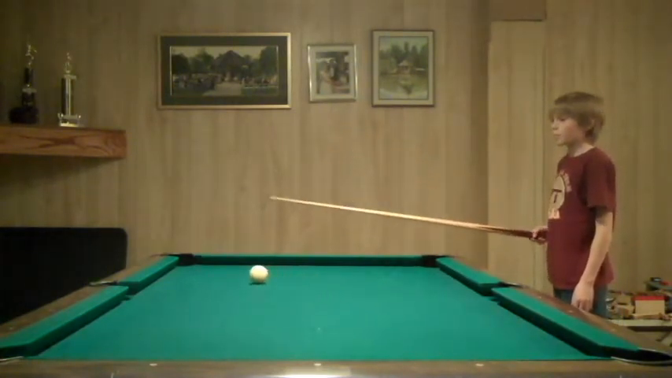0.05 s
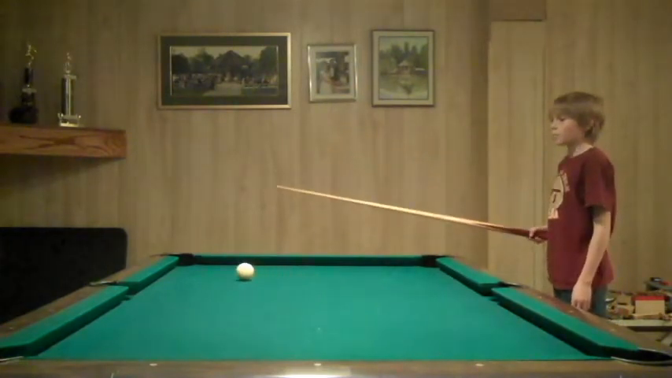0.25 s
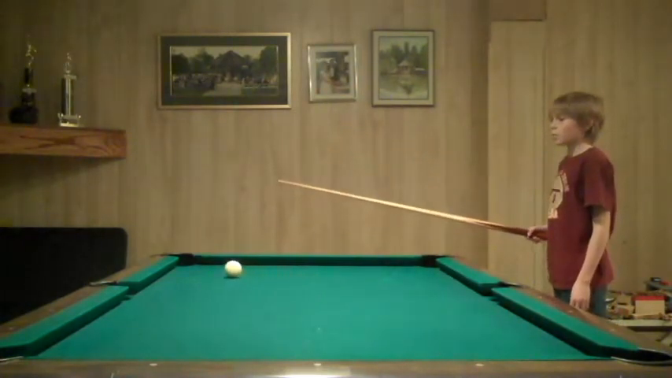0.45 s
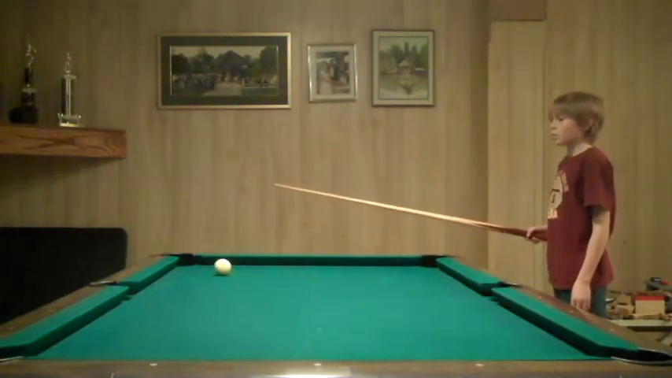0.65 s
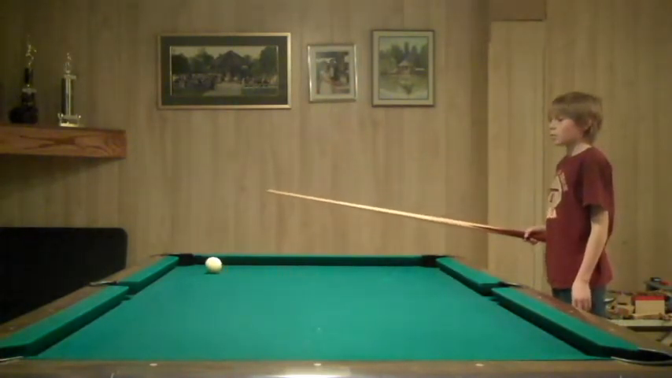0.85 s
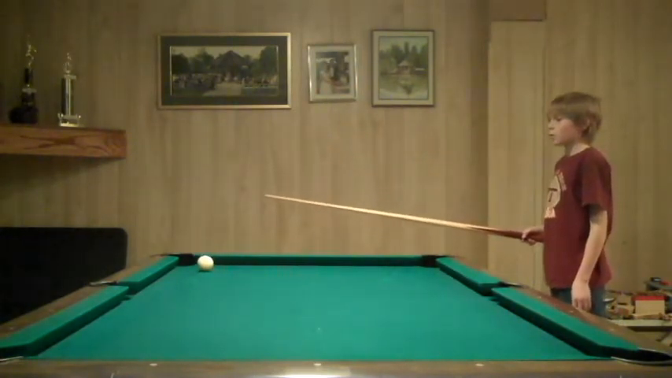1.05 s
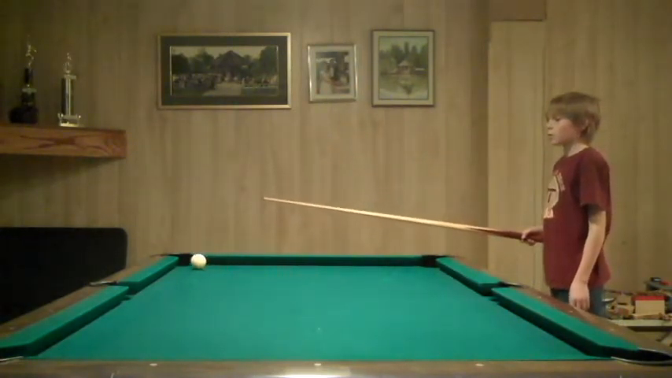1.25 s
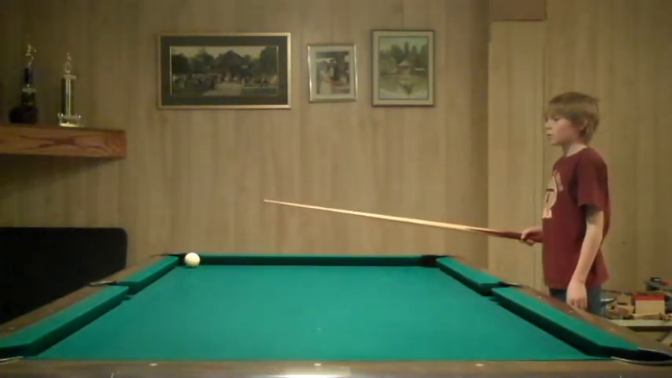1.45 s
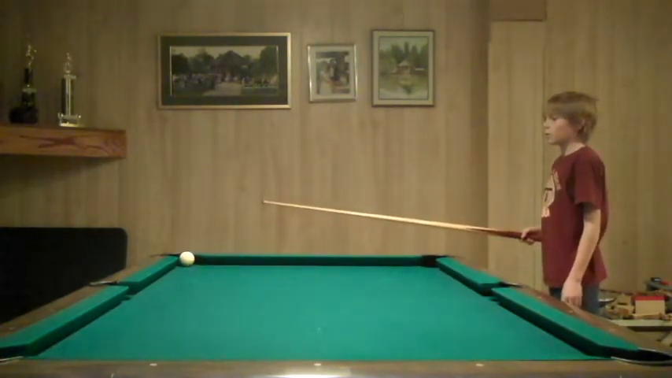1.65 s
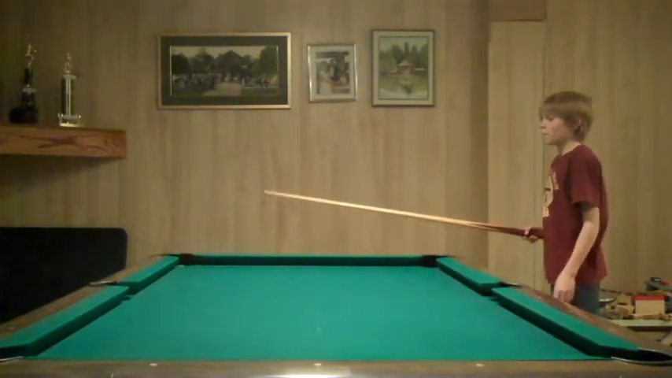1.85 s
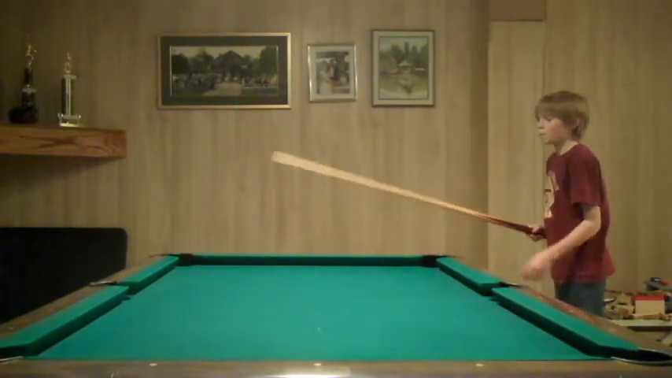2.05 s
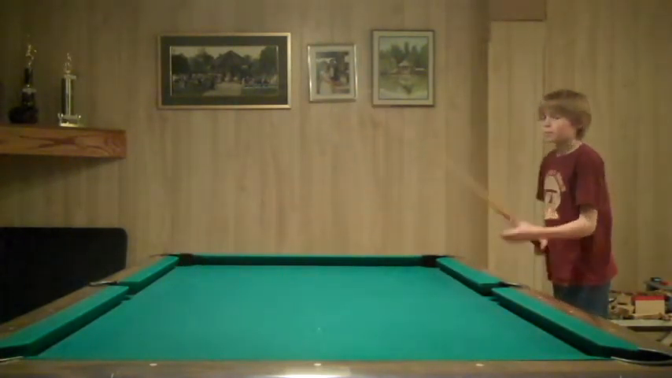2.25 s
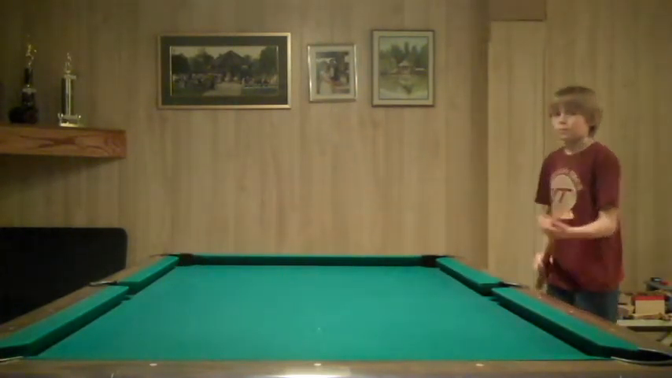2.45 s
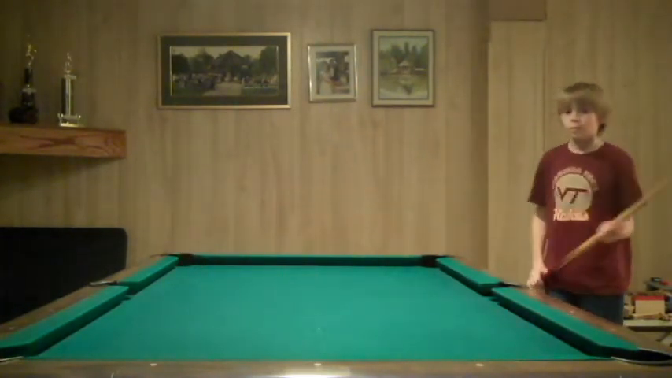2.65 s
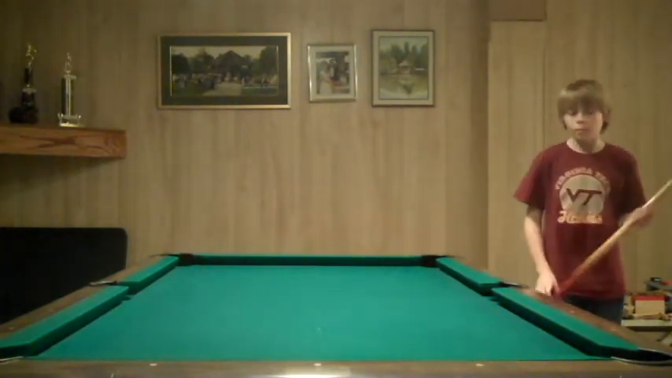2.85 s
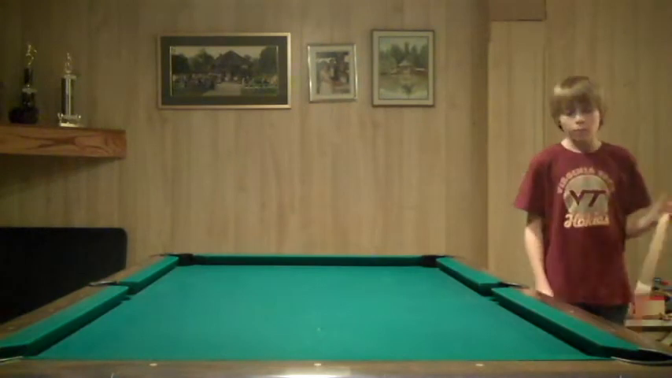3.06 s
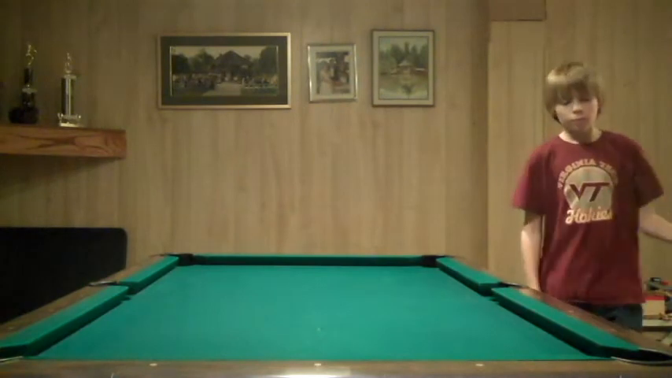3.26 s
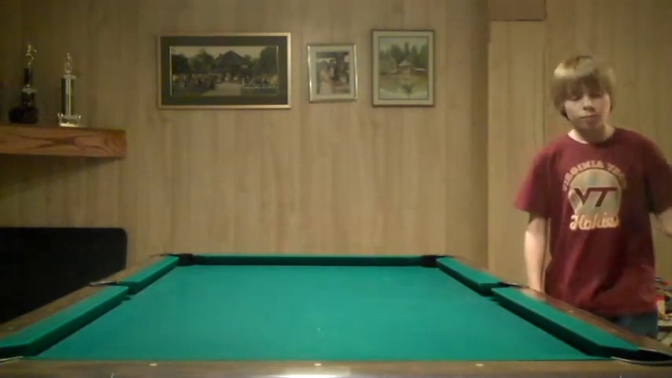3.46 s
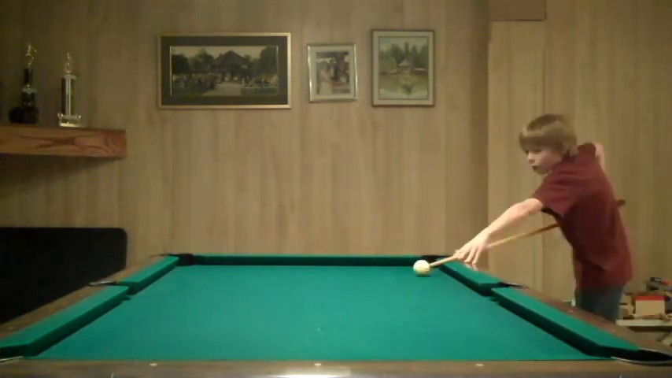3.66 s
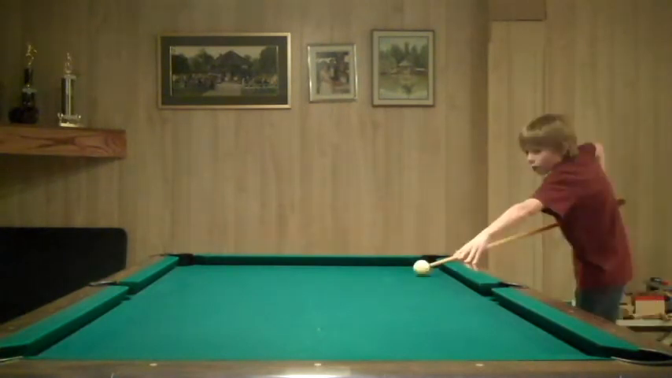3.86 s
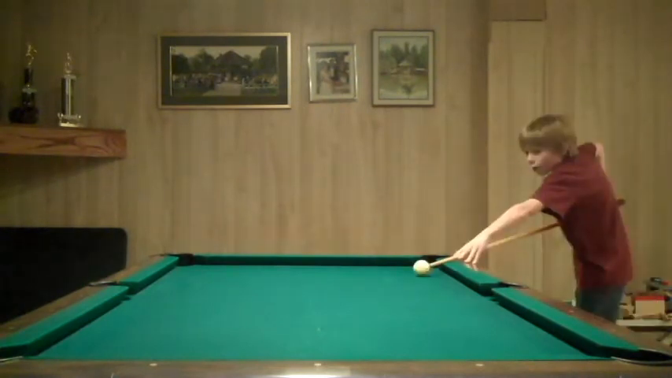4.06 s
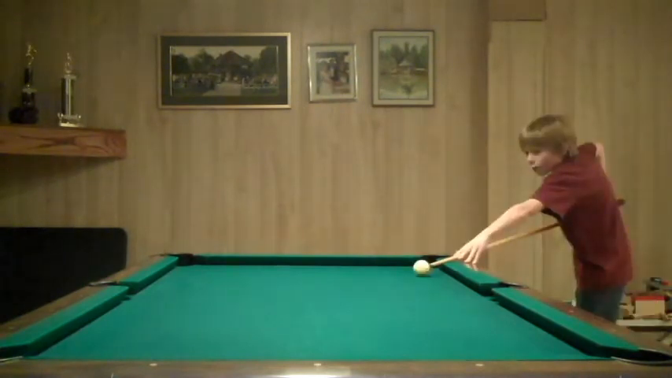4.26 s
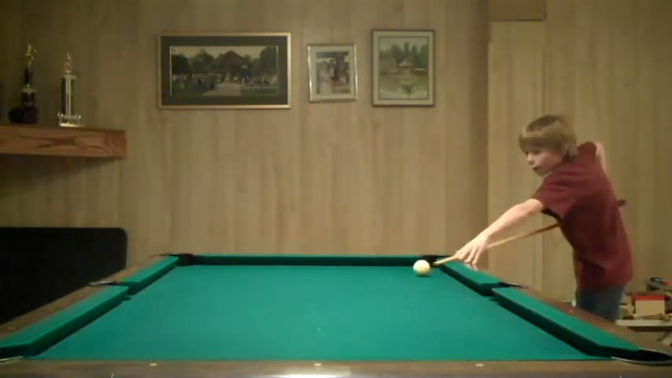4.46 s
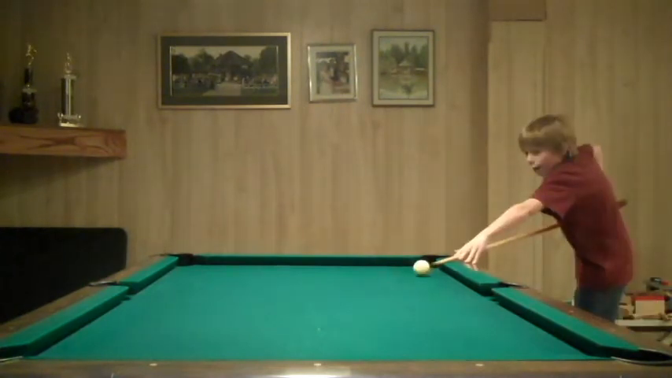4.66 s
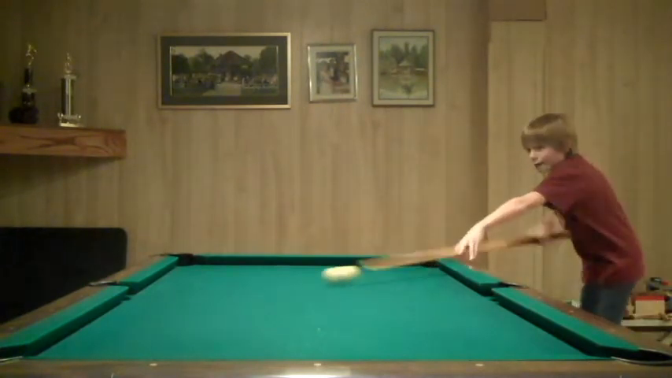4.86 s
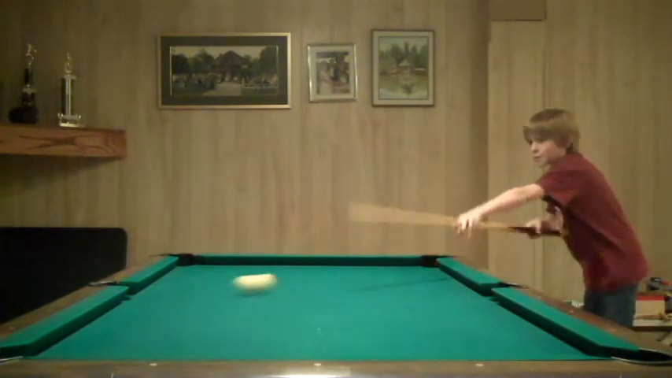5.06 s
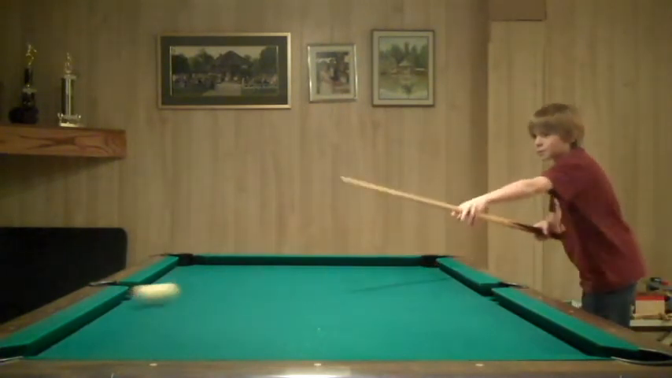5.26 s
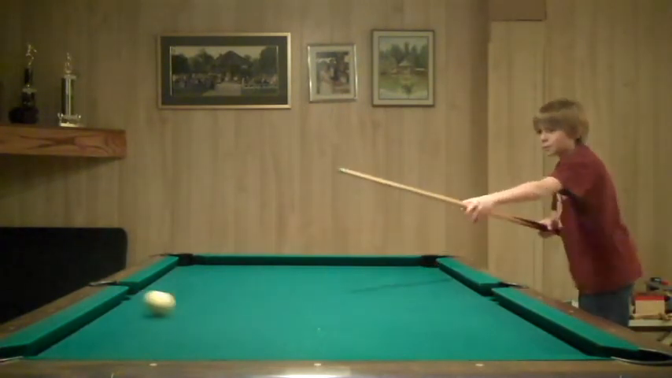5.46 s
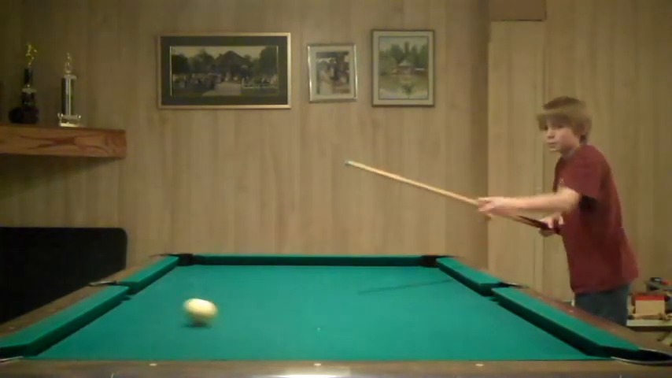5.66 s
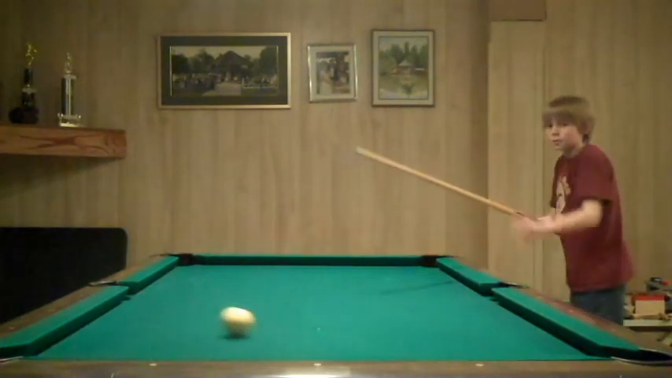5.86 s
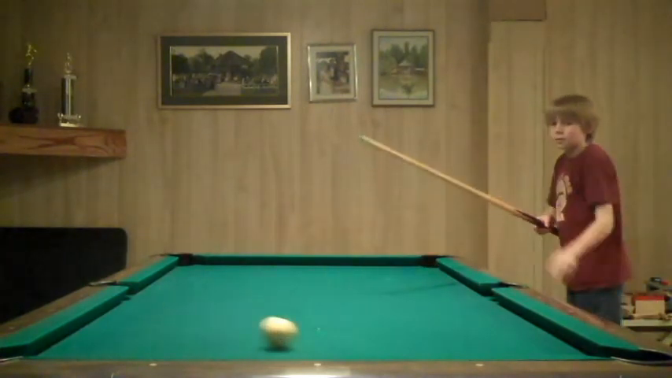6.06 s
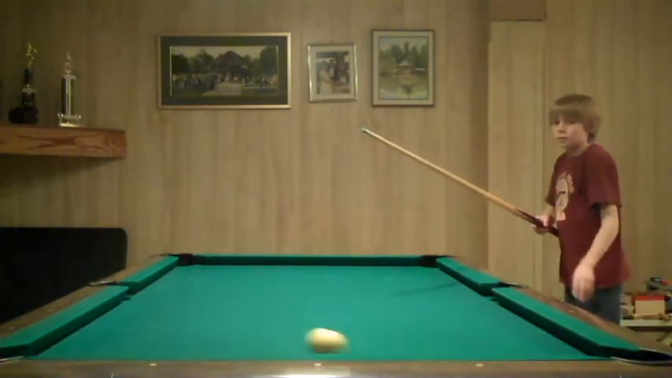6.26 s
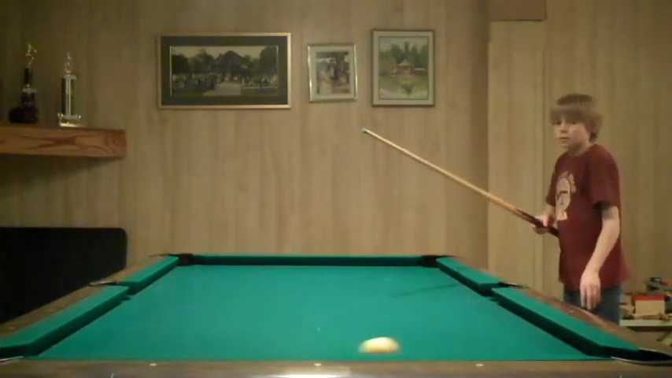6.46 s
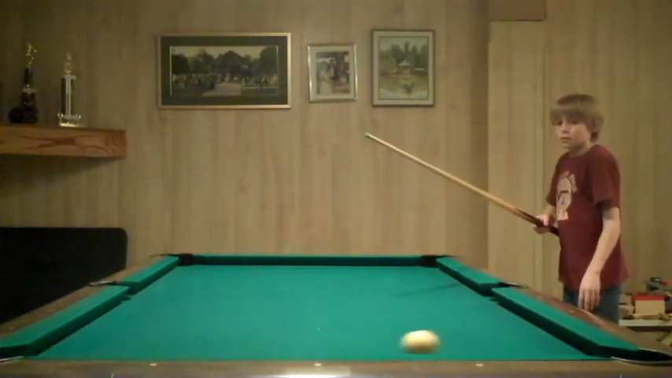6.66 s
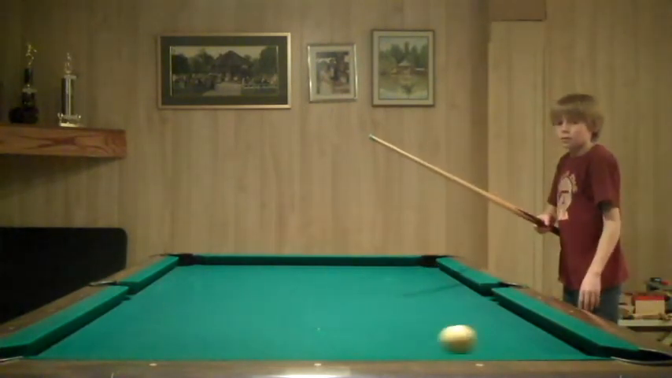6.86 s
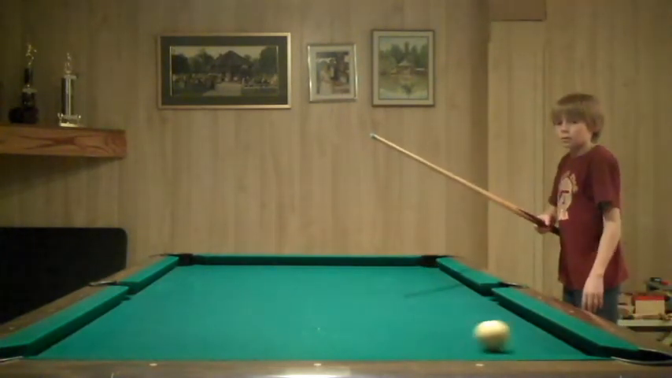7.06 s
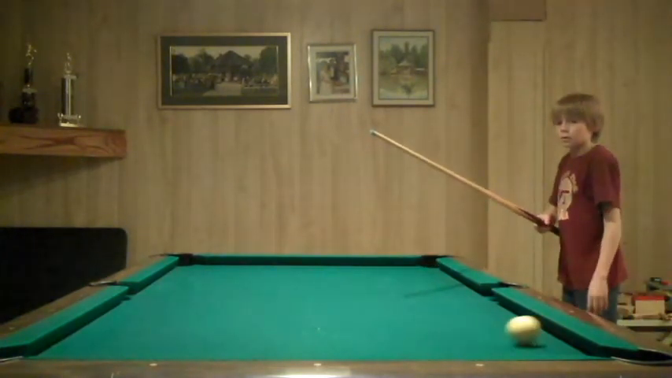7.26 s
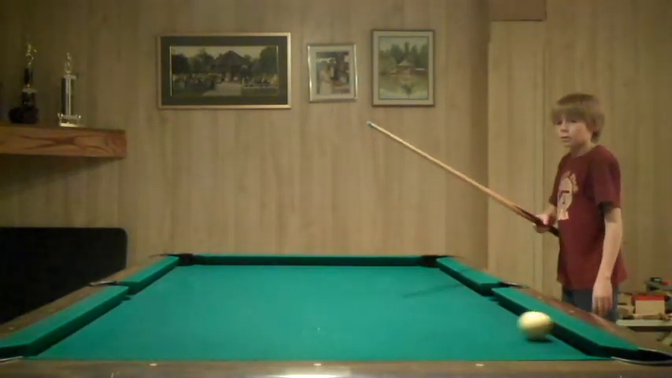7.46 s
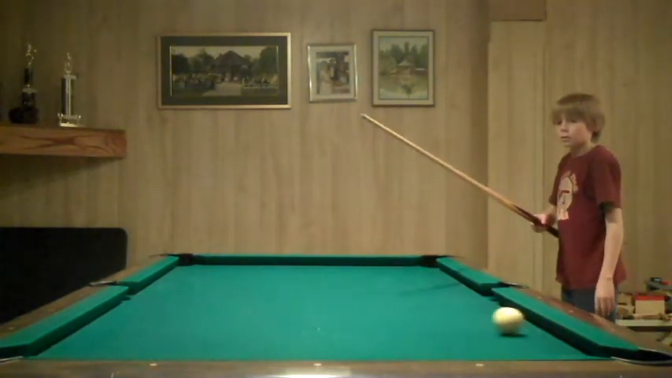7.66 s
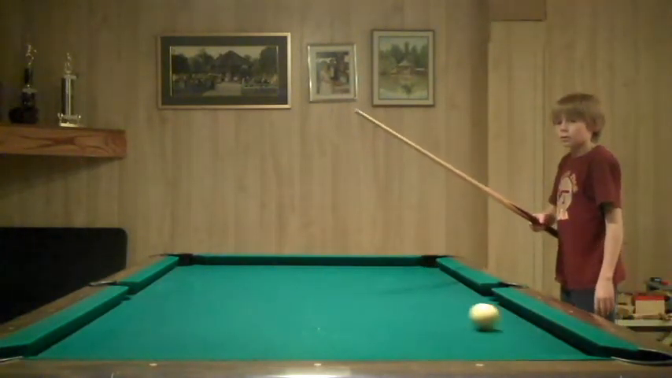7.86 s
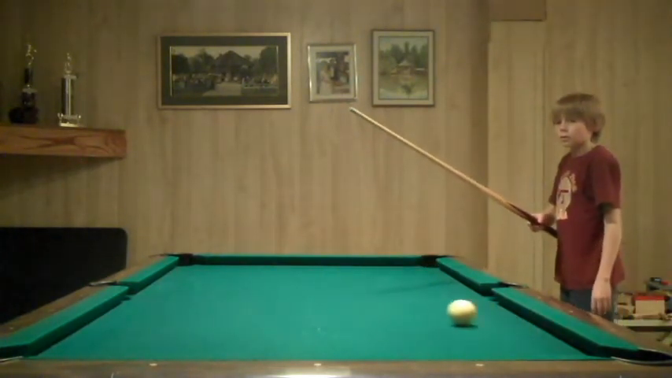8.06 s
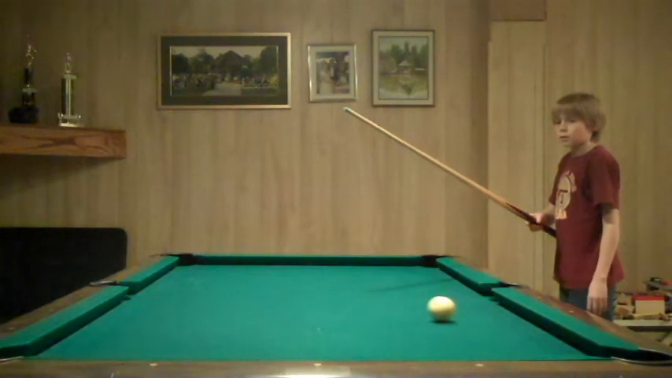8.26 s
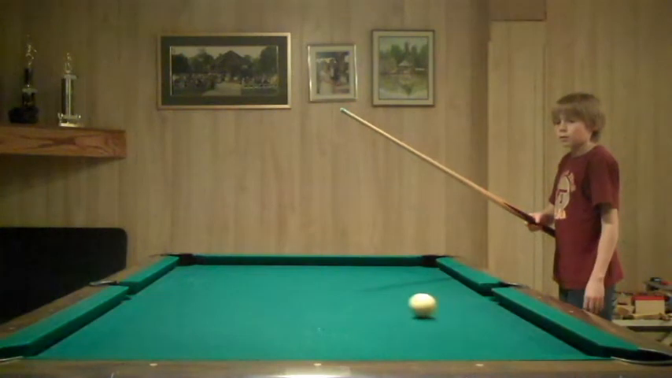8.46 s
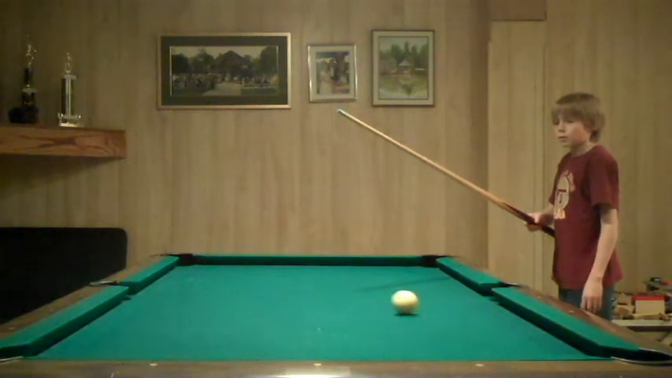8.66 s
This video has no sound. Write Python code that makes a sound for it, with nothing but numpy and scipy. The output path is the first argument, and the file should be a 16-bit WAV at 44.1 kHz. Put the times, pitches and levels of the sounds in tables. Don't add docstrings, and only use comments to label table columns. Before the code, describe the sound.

Over camera hiss, low house hum and a faint motor, a ball drops into a pocket with a sharp loud clack and a few duller ones. After a tiny silent gap the motor is gone and everything is half speed: a stuttering cue crack, a woody thud with ringing, rumbling roll, and three progressively weaker cushion bounces. Small basement room, small stereo camera microphone a little way off.

```python
import sys
import numpy as np
from scipy import signal
from scipy.fft import rfft, irfft, next_fast_len
from scipy.io import wavfile

SR = 44100
rng = np.random.default_rng(int(sys.argv[2]) if len(sys.argv) > 2 else 0)


def wav_out(sig):
    wavfile.write(sys.argv[1], SR, np.round(np.clip(np.atleast_2d(sig).T, -1, 1) * 32767).astype(np.int16))


def voltage_ratio(level):
    return 10 ** (np.asarray(level, float) / 20)


N = 384552
GAP_START_S, GAP_END_S = 3.5947, 3.6078
LIVE = round((GAP_END_S + (N / SR - GAP_END_S) / 2 + .1) * SR)
AFTER = np.arange(round(.5 * SR)) / SR


def live_time(s):
    return np.where(s < GAP_START_S, s, GAP_END_S + (s - GAP_END_S) / 2)


def heard_time():
    t = np.arange(LIVE) / SR
    return np.where(t < GAP_START_S, t, 2 * t - GAP_END_S)


def at_hz(points, hz, axis=1):
    return np.interp(np.log(hz + 1), np.log(np.array(points)[:, 0]), np.array(points)[:, axis])


def coloured(x, table):
    size = next_fast_len(LIVE)
    hz = np.fft.rfftfreq(size, 1 / SR)
    gain = voltage_ratio(np.array([at_hz(table, hz), at_hz(table, hz, axis=2)]))
    return irfft(rfft(x, size) * gain, size)[:, :LIVE]


def resonance(x, hz, width_hz):
    r = np.exp(-np.pi * width_hz / SR)
    zeros = np.array([1, 0, -1]) * (1 - r * r) / 2
    return signal.lfilter(zeros, [1, -2 * r * np.cos(2 * np.pi * hz / SR), r * r], x)


def narrow_noise(table):
    total = 0
    for hz, width_hz, db in table:
        band = resonance(rng.standard_normal(LIVE), hz, width_hz)
        band = resonance(band, hz, width_hz)
        total = total + voltage_ratio(db) * band / band.std()
    return total


# (frequency [Hz], width [Hz], lift on hiss [dB], lift on sound [dB])
LEFT_PORT = [(6740, 130, 9.5, 4), (7580, 100, 13, 15.5), (8035, 400, 15, 13)]
RIGHT_PORT = [(6450, 560, 12, 12)]


def ports(x, axis):
    lifted = []
    for channel, port in zip(x, (LEFT_PORT, RIGHT_PORT)):
        peaks = sum((voltage_ratio(p[axis]) - 1) * resonance(channel, p[0], p[1]) for p in port)
        lifted.append(channel + peaks)
    return np.array(lifted)


def camera_gain():
    gain_db, creep_db, creep_from_s, creep_s, later_gain_db = 8.5, 2, 2.15, 0.52, 8.5
    t = heard_time()
    creep = np.clip((t - creep_from_s) / creep_s, 0, 1)
    return voltage_ratio(np.where(t < GAP_START_S, gain_db + creep_db * creep, later_gain_db))


# (frequency [Hz], left [dB per Hz], right [dB per Hz])
HISS = [(25, -100, -103), (100, -108, -113), (440, -102.5, -111.5), (1250, -104.5, -112.5),
        (3000, -109, -114), (10000, -116, -116), (14150, -116.5, -117), (14345, -150, -150)]
# (frequency [Hz], width [Hz], level [dB rms])
HUM = [(63.1, 72, -87), (137.5, 95, -87.5), (169.5, 81, -86.5), (280, 6.5, -93.5), (387, 20, -95.5)]
# (frequency [Hz], width [Hz], level [dB rms])
MOTOR = [(59.5, 1.5, -87.5), (150, 5, -83.5)]


def background():
    hiss = coloured(rng.standard_normal((2, LIVE)), HISS) * np.sqrt(SR / 2)
    hum = narrow_noise(HUM) + narrow_noise(MOTOR) * (heard_time() < GAP_START_S)
    balance_db = np.array([[1], [-1]])
    return camera_gain() * (ports(hiss, axis=2) + hum * voltage_ratio(balance_db))


# (frequency [Hz], t60 [s])
ROOM_T60 = [(60, 0.21), (250, 0.51), (600, 0.56), (1200, 0.41), (2500, 0.35), (5000, 0.37), (10000, 0.29)]
# (frequency [Hz], likeness [0-1])
LIKENESS = [(100, 1), (640, 0.94), (2100, 0.73), (3500, 0.15), (6800, 0.36), (12000, 0.015)]
# (delay [ms], level [dB])
EARLY = [(2.9, -2), (5.6, -9), (10.5, -1)]


def room(t, direct_db):
    edges_hz, tail = 40 * 2 ** np.arange(0, 9, .5), 0
    lumps = voltage_ratio(2.4 * np.minimum(rng.exponential(1, len(t)), 5) * np.exp(-t / 0.041))
    white = rng.standard_normal((2, 2, len(t))) * lumps * np.clip((t - .0008) / 0.00083, 0, 1)
    for k, (low, high) in enumerate(zip(edges_hz, edges_hz[1:])):
        band = signal.butter(2, [low, high], "band", fs=SR, output="sos")
        mid, side = signal.sosfilt(band, white[k % 2])
        hz = np.sqrt(low * high)
        alike = np.clip(at_hz(LIKENESS, hz), 0, 1)
        stereo = np.sqrt(1 + alike) * mid + np.sqrt(1 - alike) * side * [[1], [-1]]
        tail = tail + voltage_ratio(-60 * t / at_hz(ROOM_T60, hz)) * stereo
    tail = voltage_ratio(-21) * tail
    tail[:, 0] += voltage_ratio(direct_db)
    for ms, db in EARLY:
        at = round(ms * rng.uniform(.8, 1.2) * SR / 1000)
        tail[:, at] += voltage_ratio(direct_db + db + rng.normal(0, 1.3, size=2))
    return tail


def add(out, s, dry, direct_db, near=0):
    at = round(float(live_time(s)) * SR)
    heard = signal.fftconvolve(room(AFTER, direct_db), dry[None])[:, :len(dry)] + near
    out[:, at:at + len(dry)] += heard[:, :LIVE - at]


def modes(table, t):
    total = 0
    for hz, db, t60 in table:
        total = total + voltage_ratio(db + rng.normal(0, 0.24) - 60 * t / t60) * np.sin(2 * np.pi * hz * t)
    return total


def thud(body):
    return modes(body, AFTER) * (1 - np.exp(-AFTER / 0.0053))


KINDS = {"hard": (-13, 0.5), "dull": (-12, -23), "tap": (-1.16, -1.5), "tick": (-13.5, 11.2),
         "cue": (-18.5, 3.4), "thud": (-5, -9)}
# (time on the slowed clock [s], level [dB], contact pitch [Hz], direct sound [dB], kind)
KNOCKS = [(0.812, -59, 2000, -17, "tick"), (2.061, -5, 2800, 1.5, "hard"), (2.172, -19, 2130, 5, "dull"),
          (2.4551, -23.5, 1870, -3.5, "dull"), (2.505, -30.5, 1390, -11, "dull"),
          (7.7956, -45.5, 850, 2, "hard"), (3.013, -47.5, 2000, -5, "tap"),
          (3.455, -48.5, 2460, -12.5, "tap"), (3.48, -55, 2580, -8, "tick"),
          (5.0168, -11.5, 1050, -0.5, "cue"), (5.200, -20.5, 482, -4, "thud"),
          (4.92, -53, 1200, -10.5, "hard"), (7.7780, -48, 2535, 11, "tick")]
CUE_STROKE = 9
# (frequency [Hz], level [dB], t60 [s])
TABLE = [(69.98, -7, 0.2), (121, -5.5, .08), (248, -0.5, 0.046), (404, -1, 0.033), (632, -2.5, 0.015),
         (896, 4.5, 0.017)]
# (frequency [Hz], level [dB], t60 [s])
CUE = [(654.5, -23, 0.027), (850, -22, 0.011), (1050, -33.5, 0.054), (1790, -35.5, 0.07), (1886, -34, .1),
       (2000, -10.5, 0.0045), (2670, -2, 0.0039), (3820, -6, 0.0026), (7414, -30, 0.25)]
# (frequency [Hz], level [dB], t60 [s])
SHAFT = [(1880, -21, 0.52), (5230, -43, .3), (7400, -41, .18)]
# (frequency [Hz], level [dB], t60 [s])
APRON = [(491, -10.5, 0.46), (620, -14, 0.32)]


def knocks():
    out, t = np.zeros((2, LIVE)), AFTER
    for s, db, hz, direct_db, kind in KNOCKS:
        body_db, snap_db = KINDS[kind]
        contact = np.sin(2 * np.pi * hz * t) * np.exp(-1.3 * hz * t)
        contact = signal.lfilter(*signal.butter(1, 0.14 * hz, "high", fs=SR), contact)
        snap = np.sin(2 * np.pi * 5800 * t) * np.exp(-t / 0.00012)
        dry = contact + voltage_ratio(snap_db) * snap + voltage_ratio(body_db - 6.5) * thud(TABLE)
        near = 0
        if kind == "cue":
            dry = dry + modes(CUE, t)
            near = voltage_ratio(db) * thud(SHAFT)
        elif kind == "thud":
            near = voltage_ratio(db) * thud(APRON)
        add(out, s, voltage_ratio(db) * dry, direct_db, near)
    return out


# (time as heard [s], level [dB], frequency [Hz])
THUMPS = [(0.82, -58, 175), (1.731, -58.5, 175), (3.541, -60, 177.7), (3.72, -63.5, 185.7),
          (6.26, -54.5, 259.8), (6.329, -56, 243), (6.442, -62, 270.3), (7.34, -55.5, 164.7),
          (8.25, -64.5, 168.7)]


def thumps():
    t, swell_s, total = np.arange(LIVE) / SR, .013, 0
    for s, db, hz in THUMPS:
        since = np.maximum(t - live_time(s), 0)
        swell = since / swell_s * np.exp(1 - since / swell_s)
        total = total + voltage_ratio(db + 4.0) * swell * np.sin(2 * np.pi * hz * since)
    return total


# (frequency [Hz], width [Hz], level [dB])
ROLL_MODES = [(87.5, 90, -4), (160, 81, -3), (243.5, 70, 2.5), (526.2, 290, -7), (1200, 2700, -11.5)]


def rolling():
    launch_s, launch_db, roll_db, slowing_db_per_s = 5.17, -10.5, -64.5, 4.5
    skid_db, skid_lag_s, rise_db_per_s, fall_db_per_s = -28.5, 0.12, 52.5, 80
    t = heard_time()
    gain = voltage_ratio(roll_db - slowing_db_per_s * (t - launch_s))
    for s, body_db in [(launch_s, launch_db)] + [(row[0], row[3]) for row in CUSHIONS]:
        since = t - s - skid_lag_s
        skid = voltage_ratio(body_db + skid_db + np.minimum(rise_db_per_s * since, -fall_db_per_s * since))
        gain = gain + (t > s) * skid
    return (t > launch_s) * gain * narrow_noise(ROLL_MODES)


def even_burst(delay_s):
    size = 128
    rise = np.arange(size) / SR / .0006
    spectrum = rfft(rng.standard_normal(size) * rise * np.exp(1 - rise))
    burst = irfft(spectrum / abs(spectrum), size) * np.sqrt(size / 4)
    return np.roll(np.pad(burst, (0, len(AFTER) - size)), round(delay_s * SR))


# (time as heard [s], delay of rail crack [ms], crack [dB], table body [dB])
CUSHIONS = [
    (5.6742, 1.7, -24, -22),
    (6.7834, 3.2, -36, -30.5),
    (7.7601, 5.0, -39.5, -42.5),
]
# (frequency [Hz], width [Hz], level [dB])
RAIL = [(1200, 740, -2.5), (2460, 1370, 1.5), (4160, 1300, -2.5), (6480, 2000, -3), (14400, 3300, -3)]
# (frequency [Hz], level [dB], t60 [s])
FRAME = [(63.5, -0.5, 0.15), (126.6, -3, 0.075), (231.4, -4.5, 0.056), (358, 0.5, 0.033),
         (447.7, 3.5, 0.021), (705.7, 2, 0.02056), (959, 2.5, 0.017), (1490, 0.5, 0.0075)]


def cushions():
    push_db, direct_db = -10, 1.8
    out, t = np.zeros((2, LIVE)), AFTER
    for s, delay_ms, crack_db, body_db in CUSHIONS:
        push = -np.sin(2 * np.pi * 800 * t) * np.exp(-t / .0005)
        burst = even_burst(delay_ms / 1000 - .0007)
        crack = 0
        for k, (hz, width_hz, db) in enumerate(RAIL):
            crack = crack + voltage_ratio(db) * resonance(burst, hz, width_hz) * (-1) ** k
        dry = voltage_ratio(body_db + push_db) * push + voltage_ratio(crack_db) * crack + voltage_ratio(body_db - 4.5) * thud(FRAME)
        add(out, s, dry, direct_db, near=voltage_ratio(crack_db - 2.2) * crack)
    return out


# (start of holding slice [s], jump back [ms], jumps before it [count],
# slices played straight from it [count])
STUTTERS = [
    (5.003, 12.35, 2, 2),
    (5.663, 13.4, 1, 2),
    (6.773, 11.6, 1, 2),
    (7.748, 13.2, 1, 3),
]


def half_speed(live):
    slice_s, first_slice_s = .015, 3.608
    step, fade, reach, ahead = (round(s * SR) for s in (slice_s, .005, .003, .0095))
    out = np.zeros((2, N + SR))
    gap_start = round(GAP_START_S * SR)
    out[:, :gap_start] = live[:, :gap_start]
    rise = np.sin(np.arange(fade) * np.pi / 2 / fade) ** 2
    mid = live.sum(0)
    onsets = [KNOCKS[CUE_STROKE][0]] + [row[0] for row in CUSHIONS]
    forced_ms = {}
    for s, ms, jumps, straight in STUTTERS:
        holder = round((s - first_slice_s) / slice_s)
        for j in range(-2, straight):
            forced_ms[holder + j] = ms * np.clip(-j, 0, jumps)
    place = round(GAP_END_S * SR)
    for k, s in enumerate(np.arange(first_slice_s, N / SR, slice_s)):
        due, new = round(float(live_time(s)) * SR), place
        if k in forced_ms:
            onset = min(onsets, key=lambda o: abs(o - s))
            new = round((live_time(onset) - (onset - forced_ms[k] / 1000 - s)) * SR)
        elif place > due + ahead:
            match = np.correlate(mid[due - reach:due + reach + fade], mid[place:place + fade])
            new = due - reach + np.argmax(match)
        piece = live[:, new:new + step].copy()
        piece[:, :fade] = rise * piece[:, :fade] + (1 - rise) * live[:, place:place + fade]
        at = round(s * SR)
        out[:, at:at + step] = piece
        place = new + round((s + slice_s) * SR) - at
    return out[:, :N]


# (frequency [Hz], left [dB], right [dB])
TOP = [(40, -25, -28), (200, -5.5, -5.5), (505, 1.5, 0.5), (4500, 3, 3.5), (9300, -5.5, -9.5),
       (10800, -3.5, -33.5), (15000, -16, -28.5)]


def scene():
    table = knocks() + cushions() + rolling() + thumps()
    return half_speed(ports(coloured(table, TOP), axis=3) + background())


def band_limit(x):
    return signal.sosfilt(signal.butter(12, 15470, fs=SR, output="sos"), x)


def record(dry):
    rounded = 1.2 * np.tanh(dry / 1.2)
    top_cut = signal.cheby2(10, 50, 16000, fs=SR, output="sos")
    mix = signal.sosfilt(top_cut, rounded)
    return band_limit(mix)


dry = scene()
out = record(dry)
wav_out(out)
```